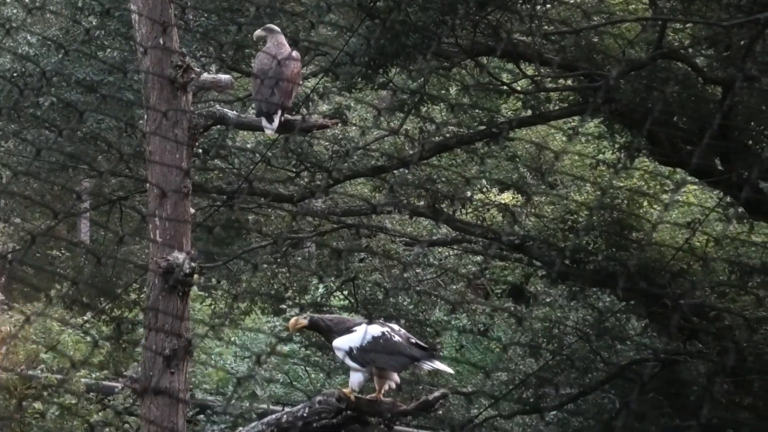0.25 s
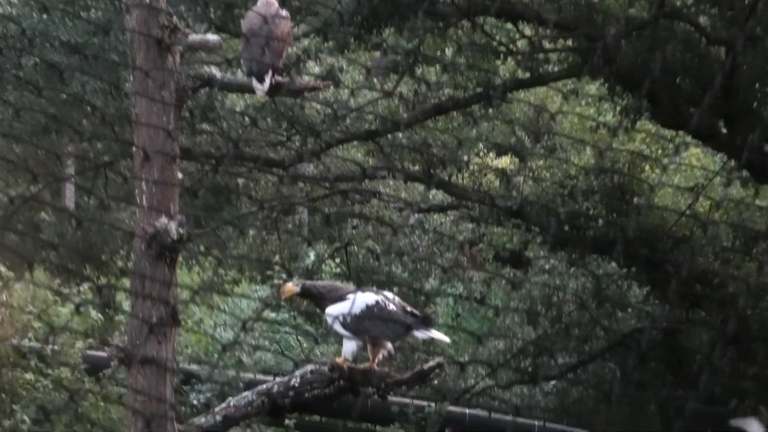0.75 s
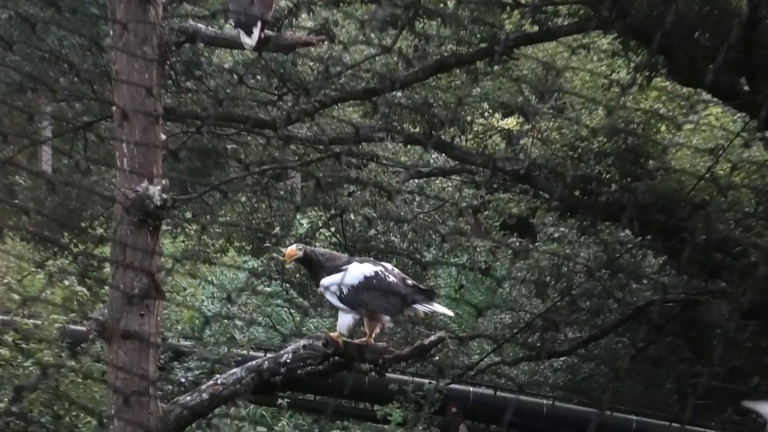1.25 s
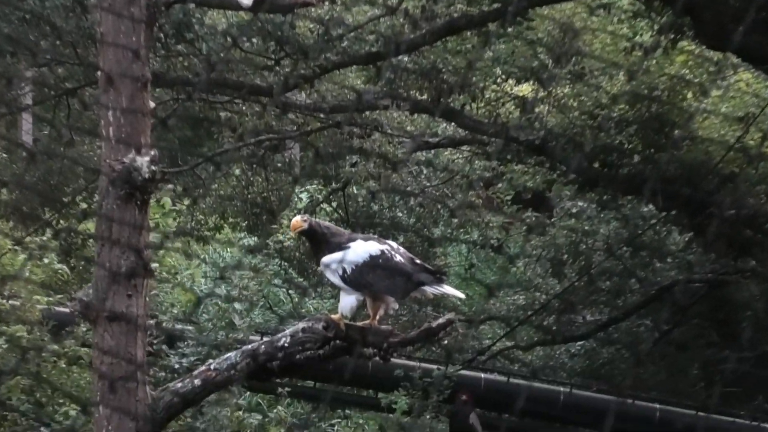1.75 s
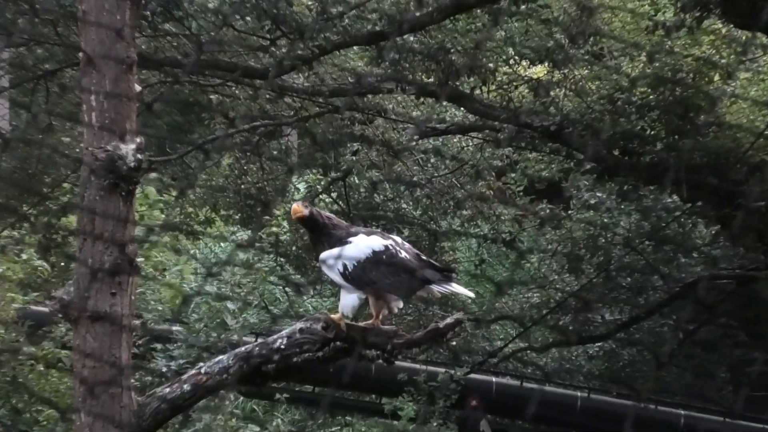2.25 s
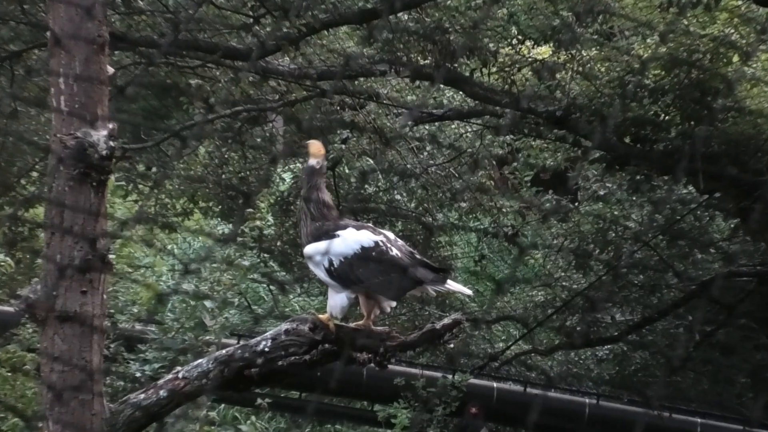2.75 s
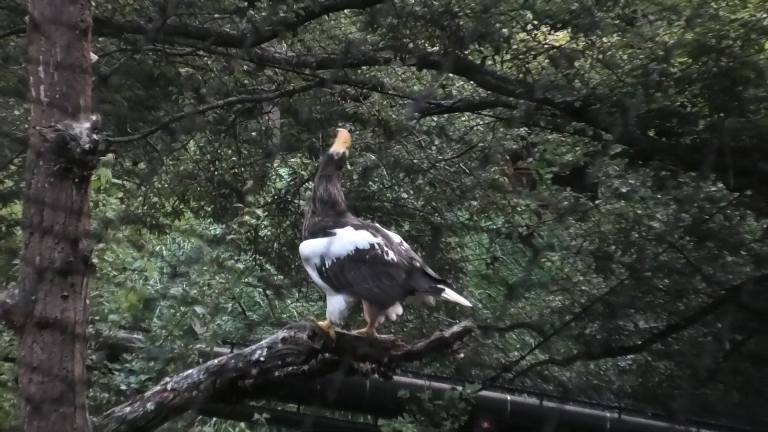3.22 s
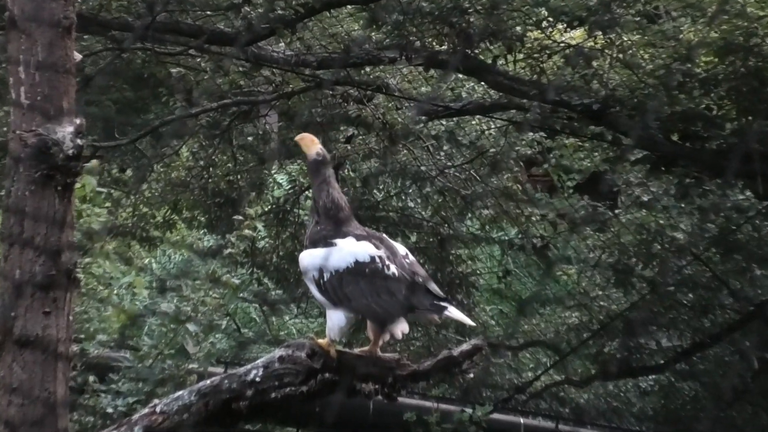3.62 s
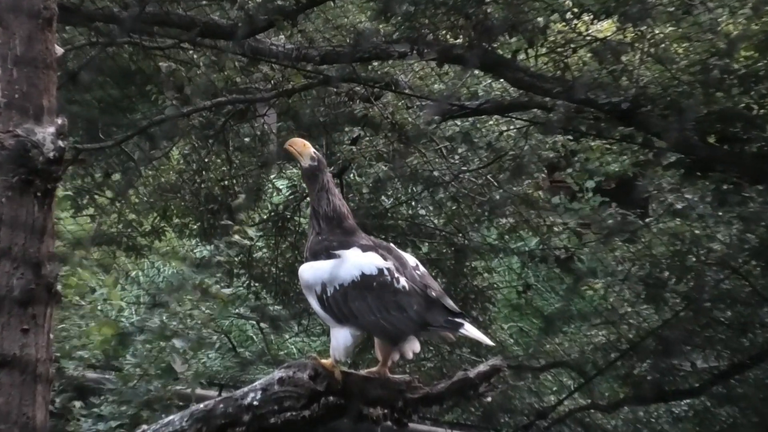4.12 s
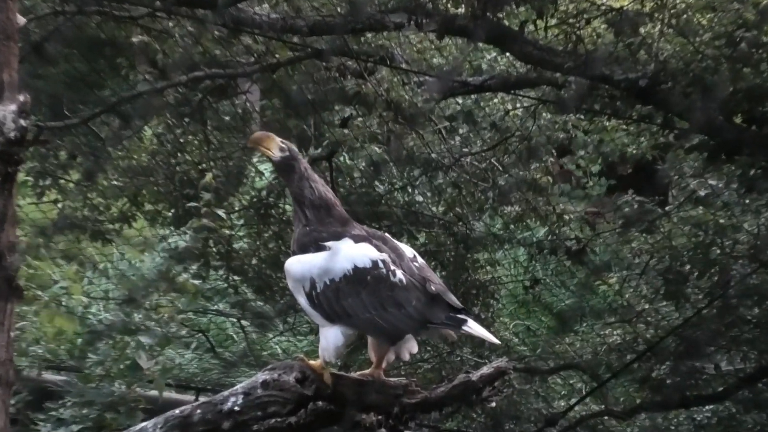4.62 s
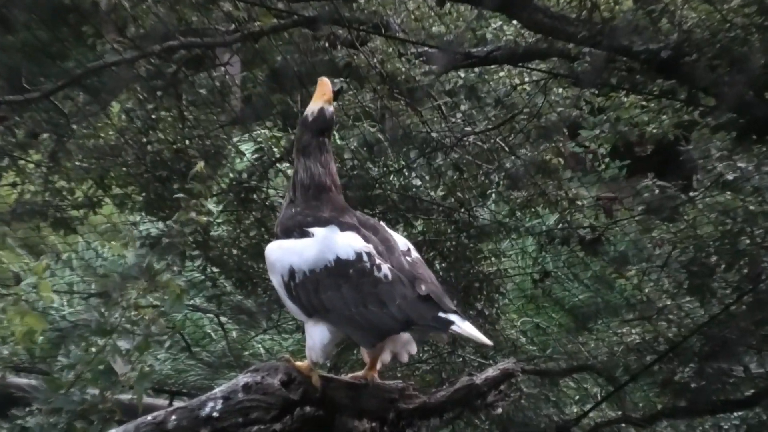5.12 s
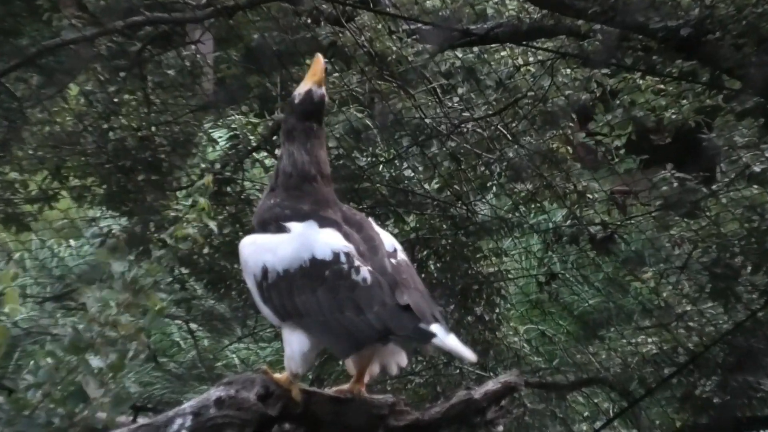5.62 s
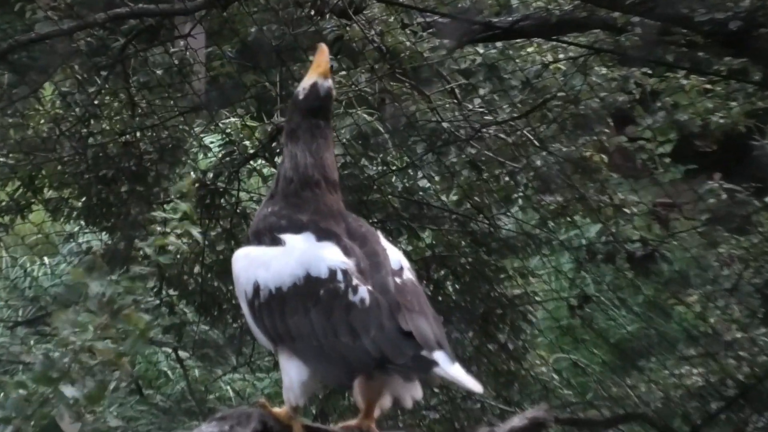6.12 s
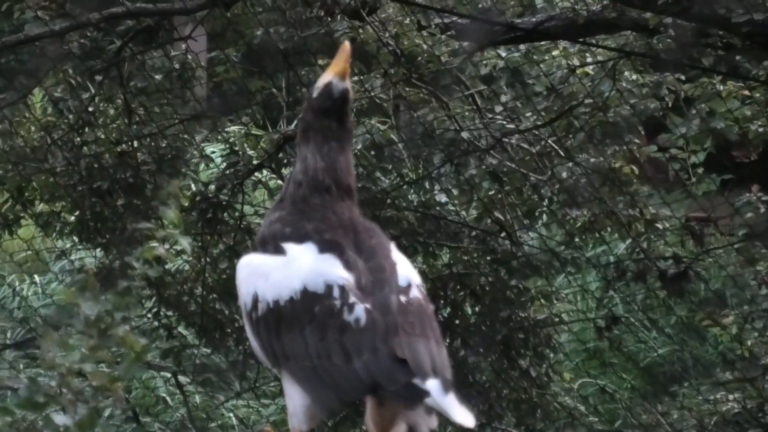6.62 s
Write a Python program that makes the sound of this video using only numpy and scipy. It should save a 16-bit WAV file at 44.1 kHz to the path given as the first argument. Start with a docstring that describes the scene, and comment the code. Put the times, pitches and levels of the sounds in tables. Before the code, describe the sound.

A dense, shrill cicada chorus and broad hiss fill a wooded aviary, with wind thumping the stereo microphone. A distant crow caws regularly to the left. Near three seconds a large eagle gives thin whistles and weak grainy clucks, followed by one soft hoot at left. After a pause come a rising whistle and five short, slightly hoarse yelps, growing louder and echoing among the trees. A lower insect buzzes slightly right.

```python
"""Shrill cicada choirs and a broad hiss are heard first, with wind buffeting two microphone ports and a cawing crow.
Then an eagle whistles thinly and clucks, a bird hoots once to the left, and the eagle yelps five times, most
yelps led by a rising whistle; an insect buzzes to the right. Voices are harmonic sums or single tones, insects
are noise or random clicks through resonances, and hiss and wind are shaped noise. The calls echo among tree
trunks, and a gain control acts on the sum: all levels in the tables are those ahead of it."""
import sys
import numpy as np
from scipy import signal
from scipy.fft import rfft, irfft, next_fast_len
from scipy.io import wavfile
from scipy.ndimage import uniform_filter1d, map_coordinates

SR = 44100
rng = np.random.default_rng(int(sys.argv[2]) if len(sys.argv) > 2 else 0)


def unload_wav(signal):
    """Save mono or channel-first audio to the path in sys.argv[1] as 16-bit WAV at rate SR, clipped to [-1, 1]."""
    wavfile.write(
        sys.argv[1],
        SR,
        np.round(np.clip(np.atleast_2d(signal).T, -1, 1) * 32767).astype(np.int16),
    )


N = 302570
TIME = np.arange(N) / SR  # [s]


def amp(db):
    """Decibel law: amplitude gain of a level in dB."""
    return 10 ** (np.asarray(db) / 20)


def unit(x):
    """Normalisation: x at rms 1."""
    return x / np.sqrt(np.mean(x ** 2) + 1e-20)


def along(points, hz):
    """Logarithmic frequency scale: interpolates (frequency [Hz], value) points."""
    point_hz, values = np.transpose(points)
    return np.interp(np.log(hz + 1), np.log(point_hz + 1), values)


def curves(rows, t=TIME):
    """Linear interpolation: one value per moment for each column after the time."""
    s, *columns = np.transpose(rows)
    return [np.interp(t, s, column) for column in columns]


def wobble(rate):
    """Slow random modulation: a smooth curve through rate random knots a second."""
    knots = rng.standard_normal(int(N * rate / SR) + 4)
    return map_coordinates(knots, [TIME * rate])


def filtered(x, response):
    """Linear filtering: the spectrum of x times a complex response of frequency."""
    m = next_fast_len(N + SR // 2)
    hz = np.fft.rfftfreq(m, 1 / SR)
    return irfft(rfft(x, m) * response(hz), m)[..., :N]


def modes(table):
    """Resonance: response of (frequency [Hz], width [Hz], level [dB]) modes, each squared for steep flanks."""
    def response(f):
        return sum(amp(db) * (1j * f * width / (centre ** 2 - f * f + 1j * f * width)) ** 2
                   for centre, width, db in table)
    return response


def spread(pair, alike):
    """Coherence: left and right of a given likeness from two unrelated signals."""
    turn = np.arccos(np.clip(alike, -1, 1)) / 2
    shared, opposed = np.cos(turn) * pair[0], np.sin(turn) * pair[1]
    return np.array([shared + opposed, shared - opposed])


def sides(pan_db):
    """Level panning: left and right gains for a left-minus-right difference in dB."""
    return amp(np.array([pan_db / 2, -pan_db / 2]))


def add(out, rows, voice):
    """Phase integration: adds one note, voice(phase, levels), over the span of (time, pitch, levels) rows."""
    a = max(round(rows[0][0] * SR), 0)
    b = min(round(rows[-1][0] * SR), N)
    hz, *levels = curves(rows, TIME[a:b])
    hz = uniform_filter1d(hz, size=600, mode="nearest")  # muscles round off every turn of pitch
    phase = 2 * np.pi * (np.cumsum(hz) / SR + rng.random())
    soft_ends = signal.windows.tukey(b - a, .12)
    out[a:b] += np.sqrt(2) * soft_ends * voice(phase, *levels)


# The eagle's loud notes: (start [s], length before the slump [s], top pitch [Hz], end pitch [Hz],
# share of the body at which pitch is highest, level [dB], 2nd harmonic re 1st [dB], 3rd harmonic re 1st [dB]);
# the beak colours the harmonics and each note fades from its level
YELP_NOTES = [(5.096, 0.083, 968, 886, .03, -30, -16.5, -33), (5.394, .066, 981, 887, .12, -27, -12.5, -28),
              (5.772, .075, 1016, 910, 0.17, -26.5, -13.5, -25),
              (6.32, .08, 1074, 922, 0.24, -23.5, -10.5, -16.5),
              (6.746, 0.078, 1070, 930, 0.19, -22, -13, -20)]


def yelps():
    """Pressure-driven oscillation: loud, slightly hoarse notes whose pitch slumps as the pressure goes."""
    out = notes(YELP_NOTES, sag=1.7, fade_db=-4.5)
    hoarseness = amp(.7 * wobble(90)) + .11 * wobble(900)
    return out * hoarseness


# The eagle's short weak notes: (start [s], length before the slump [s], top pitch [Hz], end pitch [Hz],
# share of the body at which pitch is highest, level [dB], 2nd harmonic re 1st [dB], 3rd harmonic re 1st [dB]);
# coloured and faded in the same way
CLUCK_NOTES = [(3.105, 0.049, 886, 631, 0, -43.5, -3, -14), (3.335, 0.048, 883, 845, 0, -41.5, -8, -20),
               (3.378, 0.0344, 717, 602, 0, -45, 0.5, -8)]


def clucks():
    """Irregular oscillation: under weak pressure the membranes rattle, so the notes are grainy."""
    out = notes(CLUCK_NOTES, sag=0.453, fade_db=-1.5)
    grain = amp(2.5 * wobble(110)) + .45 * wobble(700) + .35 * wobble(2500)
    return out * grain


# Colour the beak gives the upper harmonics: (frequency [Hz], gain [dB])
BEAK_COLOUR = [(1200, 4), (1500, -3), (1750, -2), (1950, 0), (2100, -1), (2400, -1), (2600, -3),
               (2850, 8.5), (3020, -4), (3250, -5.5)]
# A note starts quiet and flat, and collapses once the pressure is gone (pitches are factors)
ATTACK_S, ONSET_DB, ONSET_PITCH = 0.0071, -29, .92
SLUMP_S, SLUMP_DB, SLUMP_PITCH = 0.019, -29, 0.805


def notes(table, sag, fade_db):
    """Source and filter: attack, a body of arched pitch and fading level, then the slump, coloured by the beak."""
    out, u = np.zeros(N), np.linspace(0, 1, 9)  # u: share of the body
    for s, length, top_hz, end_hz, top, db, second, third in table:
        hz = top_hz + (end_hz - top_hz) * np.abs((u - top) / (1 - top)) ** sag
        level = db + fade_db * u ** 2
        second_db = level + second + along(BEAK_COLOUR, 2 * hz)
        third_db = level + third + along(BEAK_COLOUR, 3 * hz)
        body_s = s + ATTACK_S + u * (length - ATTACK_S)
        body = np.transpose([body_s, hz, level, second_db, third_db])
        onset = (s, ONSET_PITCH * hz[0], *(body[0, 2:] + ONSET_DB))
        slump = (s + length + SLUMP_S, SLUMP_PITCH * end_hz, *(body[-1, 2:] + SLUMP_DB))
        add(out, [onset, *body, slump], stack)
    return out


def stack(phase, first_db, second_db, third_db):
    """Harmonic series of the syrinx: uneven cycles blur the upper harmonics most, and alternate cycles differ."""
    knots = rng.standard_normal(len(phase) // 60 + 4)
    jitter = map_coordinates(knots, [np.arange(len(phase)) / 60])
    loose = phase + .2 * jitter
    first = amp(first_db) * np.sin(phase)
    second = amp(second_db) * np.sin(2 * loose)
    upper = amp(third_db) * (np.sin(3 * loose) + amp(-4) * np.sin(4 * loose))
    alternation = 1 + 0.061 * np.sin(phase / 2)
    return alternation * (first + second + upper)


# The eagle's thin whistles: (start [s], length [s], first pitch [Hz], last pitch [Hz],
# peak level before the unsteadiness [dB], share of the length at which it is loudest, held within 0.1 to 0.9)
WHISTLE_NOTES = [(2.76, 0.1, 2930, 3060, -48, 0.72), (2.844, 0.086, 3110, 2920, -47, 0.42),
                 (3.023, .095, 3040, 3104, -38, 0.53), (3.293, .045, 3200, 3490, -48, .8),
                 (4.967, 0.16, 2150, 3980, -38.5, 0.47), (5.736, .047, 3600, 4050, -42, .6),
                 (6.269, 0.061, 3350, 4200, -41, 0.89), (6.705, .042, 3650, 4170, -38, 1)]
WHISTLE_BEND = 1.9  # exponent above 1: the glide slows down
WHISTLE_START_DB, WHISTLE_END_DB = -12.5, -5  # re peak


def whistles():
    """Frequency glide: one thin unsteady sinusoid, gliding ever more slowly as it swells and dies."""
    out, u = np.zeros(N), np.linspace(0, 1, 9)  # u: share of the length
    shake = .35 * wobble(150)  # [rad]
    for s, length, first_hz, last_hz, db, peak in WHISTLE_NOTES:
        peak = np.clip(peak, .1, .9)
        rise_db = WHISTLE_START_DB * (1 - u / peak) ** 2
        fall_db = WHISTLE_END_DB * ((u - peak) / (1 - peak)) ** 2
        swell_db = np.where(u < peak, rise_db, fall_db)
        hz = last_hz + (first_hz - last_hz) * (1 - u) ** WHISTLE_BEND
        rows = np.transpose([s + u * length, hz, db + swell_db])
        add(out, rows, lambda phase, db: amp(db) * np.sin(phase + shake[:len(phase)]))
    unsteadiness = amp(3 * wobble(60) - 1.5) + .24 * wobble(500)
    return out * unsteadiness


# A soft hoot: (time [s], pitch [Hz], level [dB])
HOOT_CURVE = [(3.44, 877, -55), (3.454, 858, -52), (3.49, 856, -45), (3.505, 860, -60)]


def hoot():
    """Simple harmonic motion: one plain tone."""
    out = np.zeros(N)
    add(out, HOOT_CURVE, lambda phase, db: amp(db) * np.sin(phase))
    return out


# Shape of one caw: (time from its peak [s], pitch [Hz], level re the caw [dB])
CAW_SHAPE = [(-.075, 360, 15), (-.05, 410, 1), (-.015, 468, 2), (.005, 470, 2.5), (.05, 430, -1.5),
             (.1, 375, 6), (.115, 360, -25)]
# The caws: (peak time [s], level ahead of the throat [dB], pitch factor)
CAW_TIMES = [(0.275, -50.5, 1), (0.881, -52, .99), (1.44, -51.5, 1), (2.04, -50.5, .99), (2.65, -50, 1),
             (3.175, -50, 0.97), (3.89, -51, .99), (4.641, -50.5, .99), (5.33, -52, .97), (6.08, -51, 0.99)]
# Resonances of the crow's throat: (frequency [Hz], width [Hz], level [dB])
THROAT_MODES = [(930, 260, -27), (1370, 340, 0)]


def crow():
    """Formant filtering: an arched caw, repeated; only harmonics near the throat resonances carry this far."""
    out = np.zeros(N)

    def caw(phase, db):
        return amp(db) * sum((3 / k) ** 3.5 * np.sin(k * phase) for k in range(2, 6))

    for peak, db, factor in CAW_TIMES:
        rows = [(peak + s, hz * factor, db + level) for s, hz, level in CAW_SHAPE]
        add(out, rows, caw)
    roughness = amp(3.7 * wobble(60)) + 0.49 * wobble(500)
    return filtered(out * roughness, modes(THROAT_MODES))


def from_left(x, lag, pan_db):
    """Time and level difference: the right port hears a left source softer and lag seconds later."""
    late = filtered(x, lambda hz: np.exp(-2j * np.pi * hz * lag))
    return np.array([x, late]) * sides(np.array([pan_db]))


# Reverberation among the trunks: (frequency [Hz], time to decay by 60 dB [s])
WOODS_DECAY = [(500, 0.29), (1000, 1.1), (2000, 0.75), (4000, 0.25)]
# Left-right likeness of the echoes: (frequency [Hz], likeness)
ECHO_LIKENESS = [(800, 0.085), (1500, 0.14), (2500, 0.45), (4000, 0.92)]


def woods(x, gap):
    """Diffuse scattering: trunk echoes build up after gap seconds and decay as random noise."""
    out, step = np.zeros((2, N + 2 * SR)), SR // 3
    for a in range(0, N, step):  # the random echo pattern is drawn afresh every third of a second
        hz, t, noise = signal.stft(rng.standard_normal((2, SR)), SR, nperseg=256)
        decay = amp(-60 * t / along(WOODS_DECAY, hz)[:, None])
        build_up = 1 - np.exp(-t / 0.021)
        scattered = spread(noise, along(ECHO_LIKENESS, hz)[:, None])
        tail = signal.istft(scattered * decay * build_up, SR, nperseg=256)[1]
        tail = tail / np.linalg.norm(tail[0])
        echo = signal.fftconvolve(x[None, a:a + step], tail, axes=1)
        start = a + int(gap * SR)
        out[:, start:start + echo.shape[1]] += echo
    return out[:, :N] * amp(2.2 * wobble(40))  # the echo level wavers at random


# The lower insect: (time [s], level [dB])
BUZZ_LEVEL = [(0, -48), (.5, -45.5), (1, -40.5), (2, -43.5), (3, -43.5), (4, -47.5), (5, -47.5), (6, -44.5),
              (6.86, -49.5)]
# Its resonances, two low and two overtones: (frequency [Hz], width [Hz], level [dB])
BUZZ_RESONANCES = [(2071, 68, 2.5), (2186, 78, 2), (4107, 127, 6.5), (4373, 61, 11.5)]


def buzz():
    """Amplitude modulation: narrow resonant noise throbs about ten times a second; overtones come more directly."""
    db, = curves(BUZZ_LEVEL)
    throb_hz = 10.2 + 1.87 * wobble(2.8)
    throb = np.sin(2 * np.pi * np.cumsum(throb_hz) / SR)
    low = filtered(spread(rng.standard_normal((2, N)), alike=0.023), modes(BUZZ_RESONANCES[:2]))
    high = filtered(spread(rng.standard_normal((2, N)), alike=0.42), modes(BUZZ_RESONANCES[2:]))
    loudness = amp(db + 2.34 * throb + 1.9 * wobble(4.9))
    return loudness * unit(low + high) * sides(np.array([-2.1]))


# Choirs and hiss: (time [s], low choir [dB], middle choir [dB], high choir [dB], hiss [dB])
CHOIR_LEVELS = [(0, -28.5, -35, -47, -31.5), (.15, -30, -32, -40, -31), (.3, -30, -29, -32.5, -30.5),
                (.5, -30.5, -31, -28.5, -30), (1.2, -31.5, -28.5, -29, -30), (1.55, -30, -29, -31, -30.5),
                (1.9, -30, -27.5, -30.5, -30), (2.25, -30, -28.5, -31, -31.5),
                (2.55, -31, -29.5, -30, -30.5), (2.95, -33.5, -27, -28.5, -29.5),
                (3.4, -32.5, -28, -31.5, -31), (4.1, -34.5, -26.5, -31.5, -31), (4.7, -32, -28, -36.5, -32),
                (5.35, -40, -27.5, -31, -29.5), (5.75, -41, -26, -36, -30.5), (6.1, -36.5, -25, -37, -31.5),
                (6.45, -40, -28, -36, -31.5), (6.86, -39, -25.5, -43, -29.5)]
# Tymbal resonances, one list for each choir: (frequency [Hz], width [Hz], level [dB])
TYMBAL_MODES = [
    [(6100, 980, 3.5), (6850, 1470, 4.5)],
    [(8010, 1260, 1.5), (8300, 670, -5.5)],
    [(8830, 580, 0.5), (9230, 500, -5.5)],
]
# One near cicada rings narrowly inside the middle choir: (frequency [Hz], width [Hz], level [dB])
NEAR_CICADA = (8522, 70, -3)
# Left-right likeness of the low, middle and high choir
CHOIR_LIKENESS = [1, 1, 0.92]


def cicadas():
    """Impulse excitation: thousands of tymbal clicks a second, of scattered size, ring in resonances; hiss joins."""
    *levels, hiss_db = curves(CHOIR_LEVELS)
    low_modes, middle_modes, high_modes = TYMBAL_MODES
    tables = [low_modes, [*middle_modes, NEAR_CICADA], high_modes]
    out = 0
    for table, db, alike in zip(tables, levels, CHOIR_LIKENESS):
        clicks = (rng.random((2, N)) < .15) * rng.standard_normal((2, N))
        swell = amp(db + 0.4 * wobble(9) + 0.55 * wobble(40))
        out = out + swell * unit(filtered(spread(clicks, alike), modes(table)))
    return out * sides(np.array([.6])) + hiss(hiss_db)


# Spectrum of the hiss layer: (frequency [Hz], relative density [dB per Hz])
HISS_SPECTRUM = [(300, -19), (700, -8), (1500, -10), (2600, -9), (3600, -11), (4100, -2.5), (5000, 8),
                 (6500, 11), (9500, 4.5), (11000, 1.5), (14500, 2.5), (15400, -1.5), (16000, -20)]
# Left-right likeness of the hiss layer: (frequency [Hz], likeness)
HISS_LIKENESS = [(700, 0.091), (1500, 0.25), (3000, 0.88), (4800, 0.59), (7000, 1), (10000, 0.37),
                 (12500, .45), (15000, 0.21)]
# Side of the hiss layer: (frequency [Hz], left minus right [dB])
HISS_PAN = [(700, 4), (1300, 0), (2400, 0), (4400, -0.6), (9000, .4), (13000, -3)]


def hiss(hiss_db):
    """Spectral shaping: noise whose density, likeness and side depend on frequency."""
    hz = np.fft.rfftfreq(N, 1 / SR)
    spectrum = spread(rfft(rng.standard_normal((2, N))), along(HISS_LIKENESS, hz))
    noise = irfft(spectrum * amp(along(HISS_SPECTRUM, hz)) * sides(along(HISS_PAN, hz)), N)
    return amp(hiss_db + 0.54 * wobble(30) + 0.52 * wobble(14)) * unit(noise)


# Wind between gusts: (time [s], flutter [dB], rumble re flutter [dB], rustle re flutter [dB], left minus right [dB])
WIND_LEVELS = [(0, -33.5, -5, -10, 0), (.35, -40, -2, -9, -3), (1, -34, -0.5, -12, -1),
               (1.5, -44, 3, -6.5, -1.5), (2.1, -38, -1.5, -11.5, 2), (2.6, -43, 4, -6.5, 0),
               (3, -45.5, -3, -6.5, 1.5), (3.25, -46.5, 1, -7, -1), (3.6, -38, 1.5, -9, -0.5),
               (3.95, -36.5, 0.5, -2.5, 0), (4.35, -36, -1, 3, 0.5), (4.55, -46, -2.5, 0, 7),
               (5, -40.5, -8, -4, -0.5), (5.3, -45.5, -6, -1.5, 0.5), (5.6, -40.5, -3, -5, -2),
               (6.05, -37, -9, 3, 2.5), (6.2, -39, -8, -0.5, 0), (6.6, -44.5, -7.5, -6, 2),
               (6.86, -42.5, -9, -6.5, 1)]
# Gusts: (peak time [s], lift [dB], further lift of the rumble [dB], time from the peak to 1/e of the lift [s])
GUST_LIFTS = [(0.165, 4, 2, .03), (0.905, 3, -2, 0.037), (1.07, 2, -0.5, .03), (1.229, 3.5, 2, 0.048),
              (1.399, 5, -2, 0.083), (1.571, 3, 3, 0.025), (1.79, 3.5, 2, 0.025), (2.253, 9.5, -4, .04),
              (3.419, 3.5, 1, .03), (3.518, 0.5, -1, 0.026), (3.66, 0.5, 6.5, 0.033),
              (3.787, 4.5, -1, 0.047), (3.863, 4.5, 6.5, 0.032), (4.033, 2.5, -1, 0.015),
              (4.22, 0, 7.5, 0.036), (4.6, 6, -7, 0.018), (4.676, 9.5, -1, 0.017), (4.761, 13, 1, 0.08),
              (5.12, 3.5, 2, 0.044), (5.523, 7, 2, .03), (5.645, 4, 1, .03), (5.866, 8.5, 3, 0.08),
              (6.245, 7, 1, 0.026), (6.779, 6.5, 5, 0.046)]
# Spectra of slow, middling and fast eddies: (frequency [Hz], relative density [dB per Hz])
RUMBLE_SPECTRUM = [(15, -28), (30, -5.5), (60, 0.5), (120, 4.5), (190, -4), (400, -43)]
FLUTTER_SPECTRUM = [(70, -22), (140, -1.5), (210, 5.5), (300, -3), (450, -11.5), (800, -36.5)]
RUSTLE_SPECTRUM = [(150, -48), (300, 1.5), (400, -3.5), (600, -7), (900, -18.5), (1400, -30.5), (2500, -42)]
RUSTLE_GROWS = 1.17  # the rustle swings wider than the gusts


def wind():
    """Turbulence: eddies hit the ports in lumps, from slow rumble to fast rustle; big eddies reach both ports."""
    flutter_db, rumble_db, rustle_db, pan_db = curves(WIND_LEVELS)
    gust_db, deep_db = sum(np.outer([db, deep], np.exp(-((TIME - s) / width) ** 2))
                           for s, db, deep, width in GUST_LIFTS)
    lumps = np.array([wobble(25), wobble(25)])
    # (spectrum, level re flutter [dB], lumpiness [dB], left-right likeness)
    layers = ((RUMBLE_SPECTRUM, rumble_db + gust_db + deep_db, 1.6, .45),
              (FLUTTER_SPECTRUM, gust_db, 2.2, .15),
              (RUSTLE_SPECTRUM, rustle_db + RUSTLE_GROWS * gust_db, 3.1, -.1))
    out = 0
    for spectrum, db, lumpy_db, alike in layers:
        noise = spread(rng.standard_normal((2, N)), alike)
        air = filtered(noise, lambda hz: amp(along(spectrum, hz)))
        loudness = amp(flutter_db + db + 1.84 * wobble(14))
        out = out + loudness * unit(amp(lumpy_db * lumps) * air)
    return out * sides(pan_db + 1.24 * wobble(9))


def scene():
    """Superposition: all sources and the echoes of the calls add at the two ports."""
    voiced, thin, soft, far = yelps() + clucks(), whistles(), hoot(), crow()
    near = voiced * sides(np.array([2.2])) + thin + from_left(soft, lag=0.00013, pan_db=20)
    distant = from_left(far, lag=0.00042, pan_db=8.5)
    answered = amp(-16.5) * voiced + amp(-2.5) * thin + amp(-8) * soft + amp(-12.5) * far
    echoes = woods(answered, gap=.015)
    return near + distant + echoes + cicadas() + buzz() + wind()


GAIN_HEARS_HZ, GAIN_OVER_DB = 1500, -27.5  # it listens below this frequency and acts above this level
GAIN_SLOPE, GAIN_TIME_S = 1.25, 0.17  # dB of cut per dB of excess; time constant of turning down and recovery
TOP_HZ = 15520  # band limit


def record(dry):
    """Dynamic compression: loud low sounds turn the gain down, then it creeps back; the band limit ends the top."""
    low = filtered(dry, lambda hz: hz < GAIN_HEARS_HZ)
    louder_power = uniform_filter1d((low ** 2).max(axis=0), size=2000)
    heard_db = 10 * np.log10(np.abs(louder_power) + 1e-12)
    excess_db = np.maximum(heard_db - GAIN_OVER_DB, 0)
    keep = np.exp(-1 / (GAIN_TIME_S * SR))
    down_db = signal.lfilter([1 - keep], [1, -keep], GAIN_SLOPE * excess_db)
    return filtered(dry * amp(-down_db), lambda hz: hz < TOP_HZ)


dry = scene()
out = record(dry)
unload_wav(out)
```